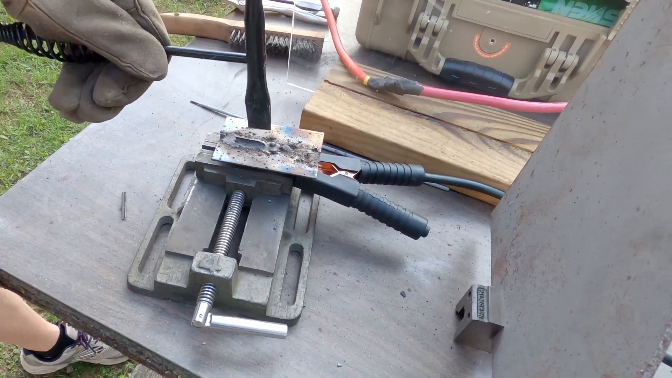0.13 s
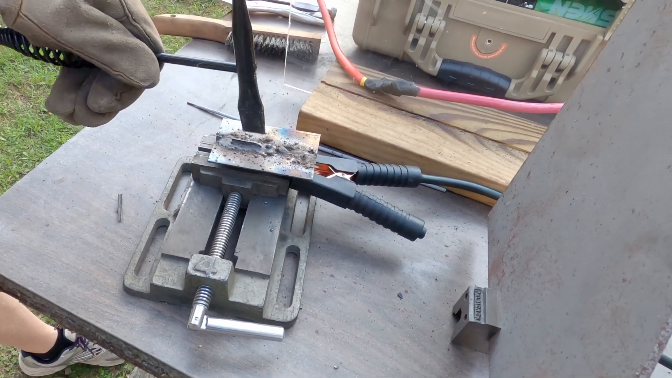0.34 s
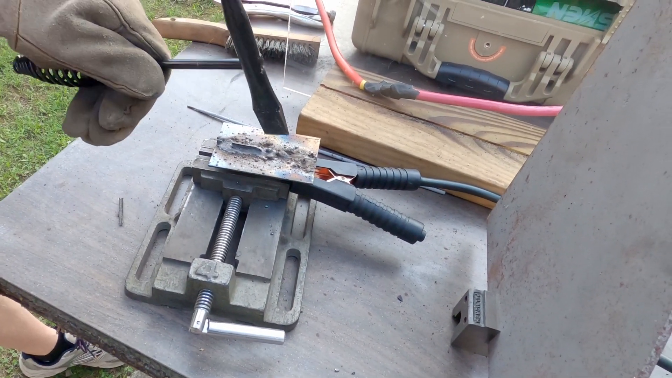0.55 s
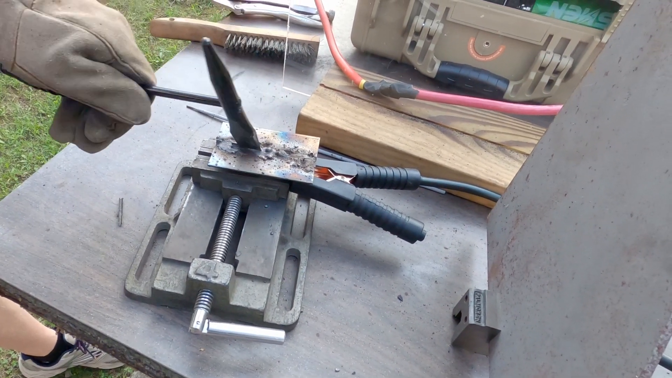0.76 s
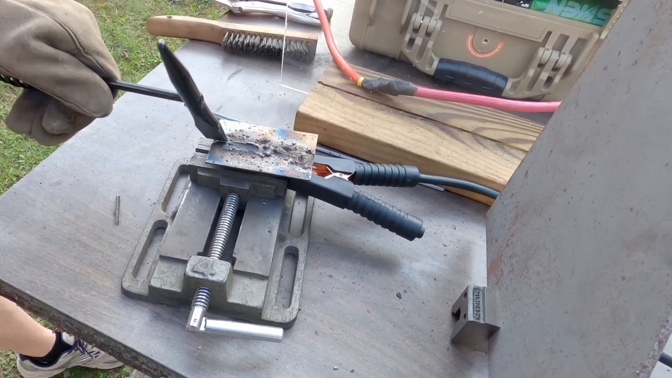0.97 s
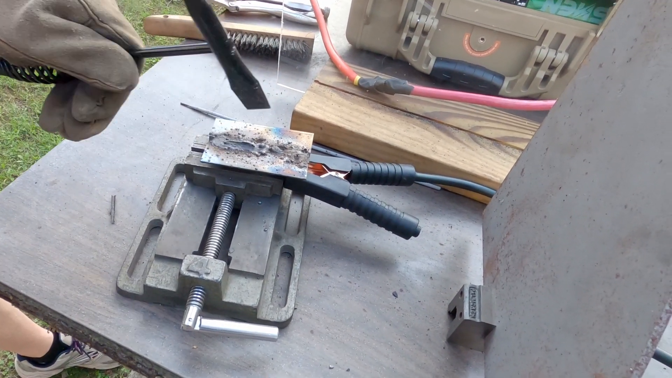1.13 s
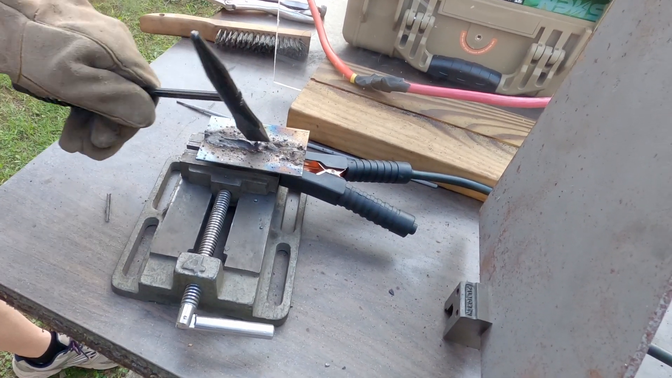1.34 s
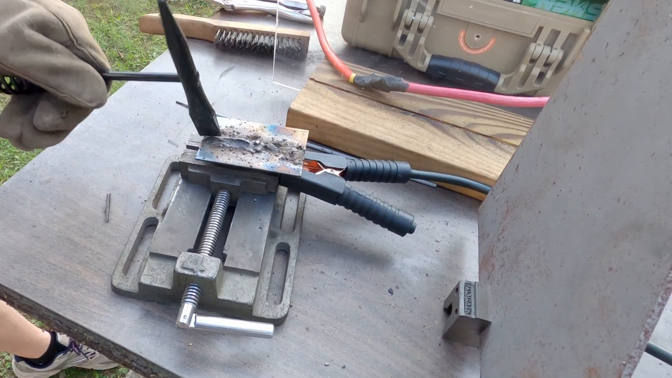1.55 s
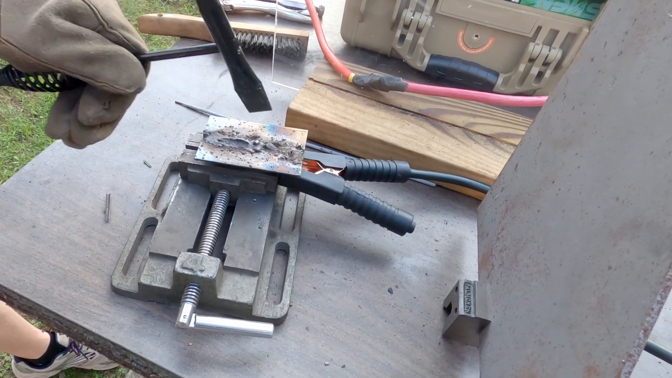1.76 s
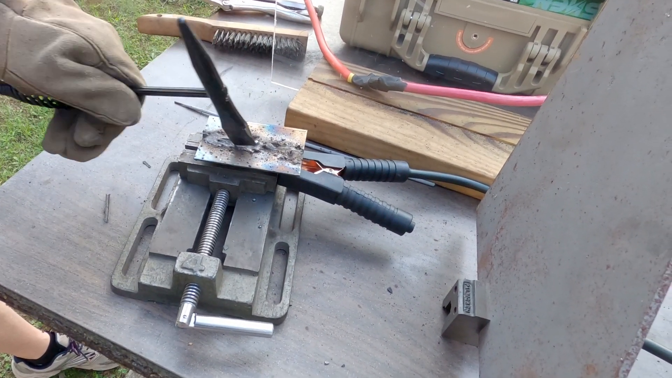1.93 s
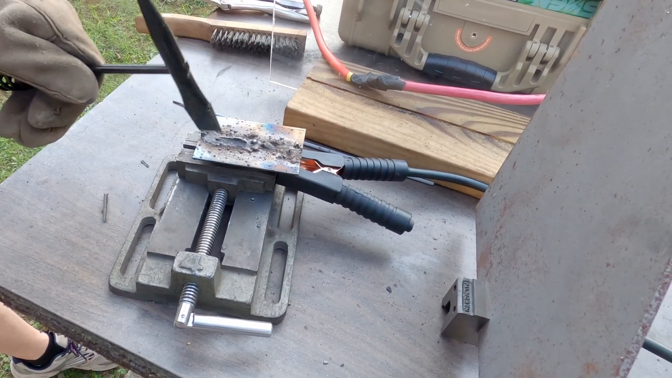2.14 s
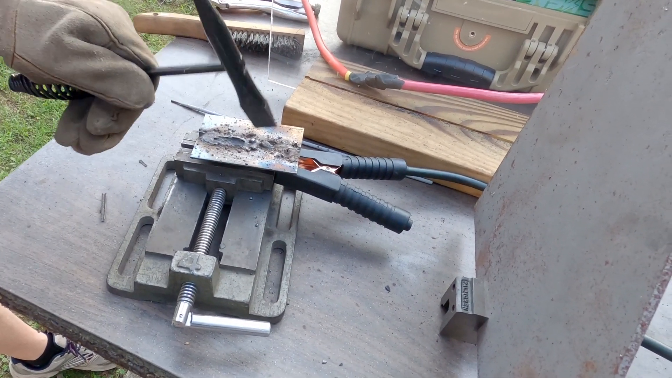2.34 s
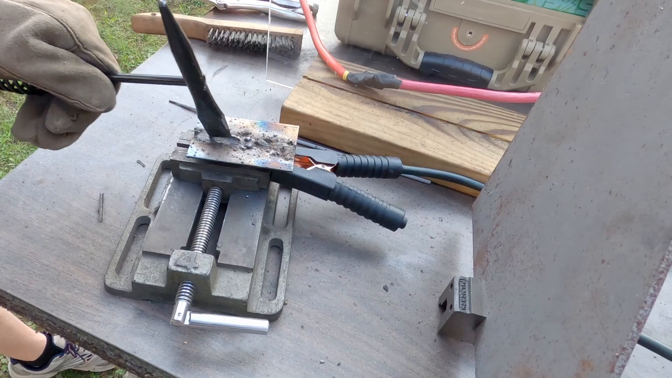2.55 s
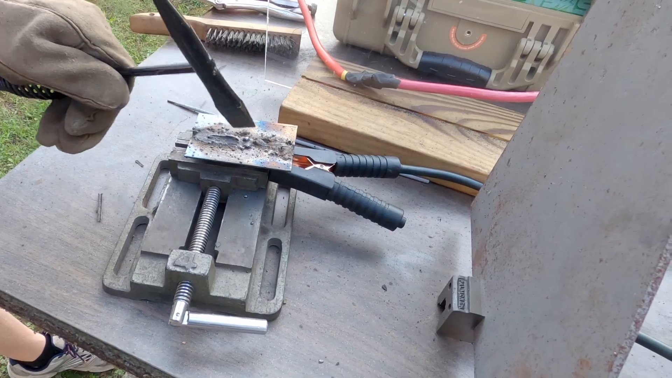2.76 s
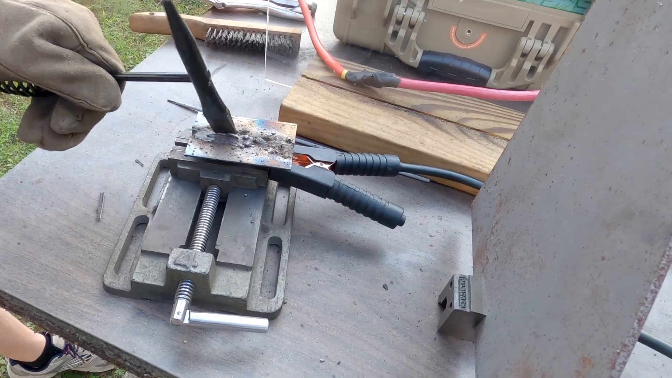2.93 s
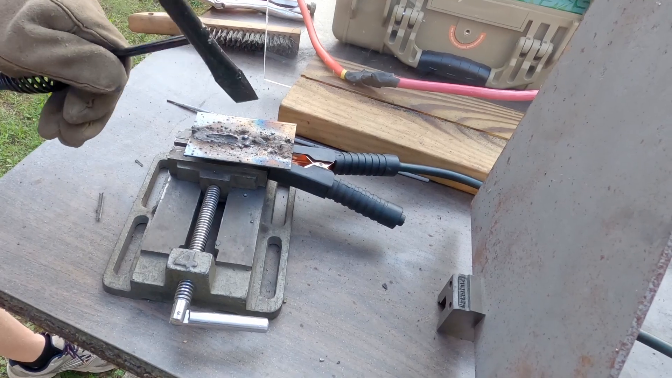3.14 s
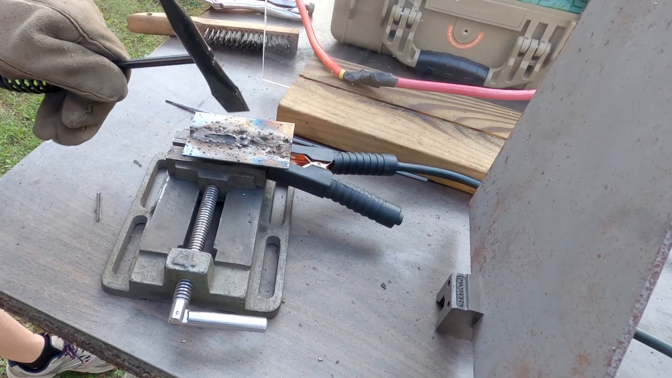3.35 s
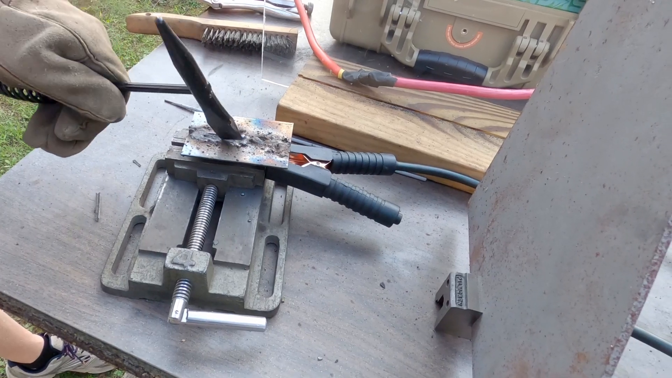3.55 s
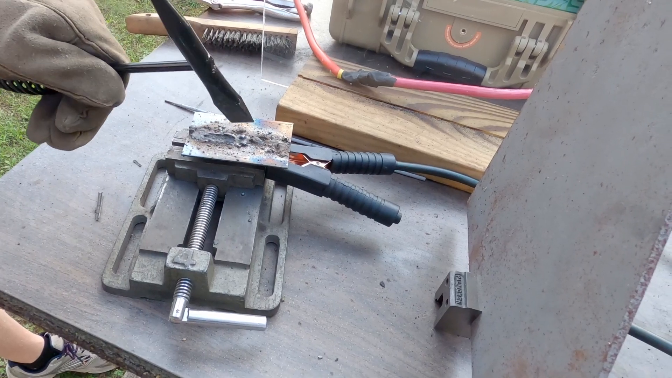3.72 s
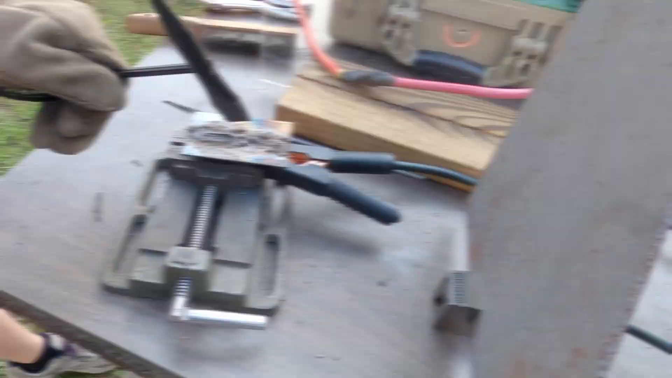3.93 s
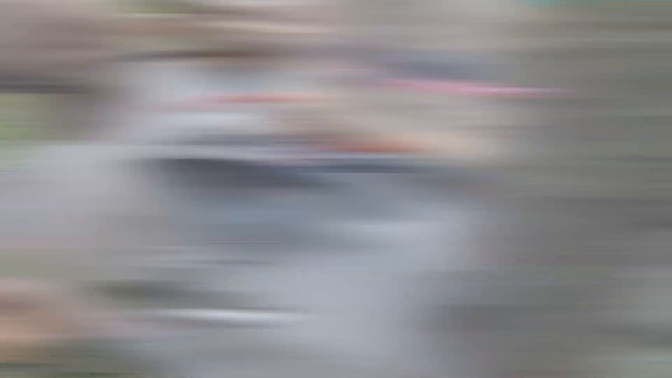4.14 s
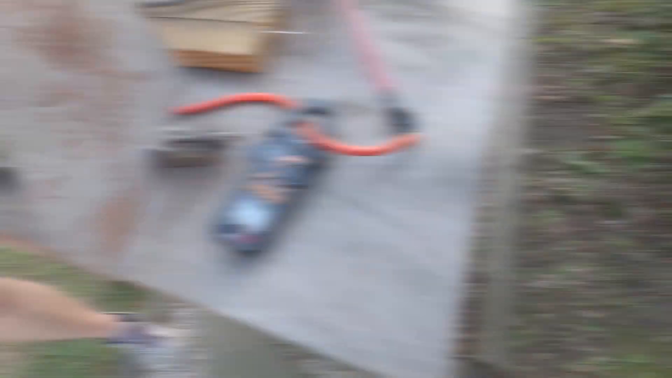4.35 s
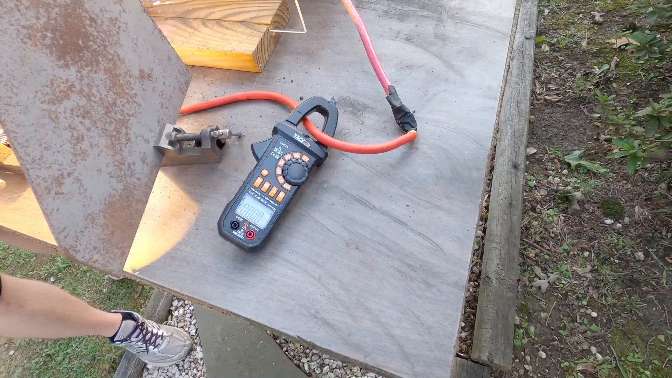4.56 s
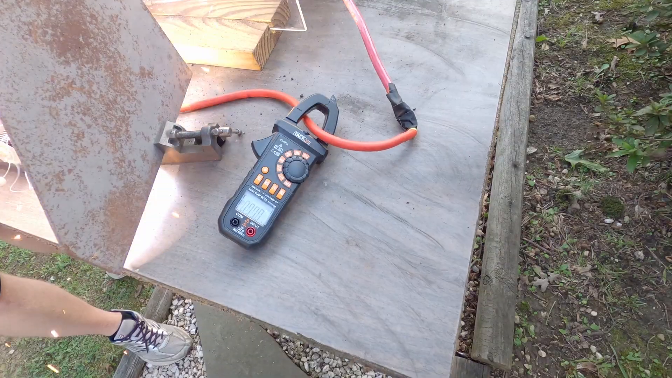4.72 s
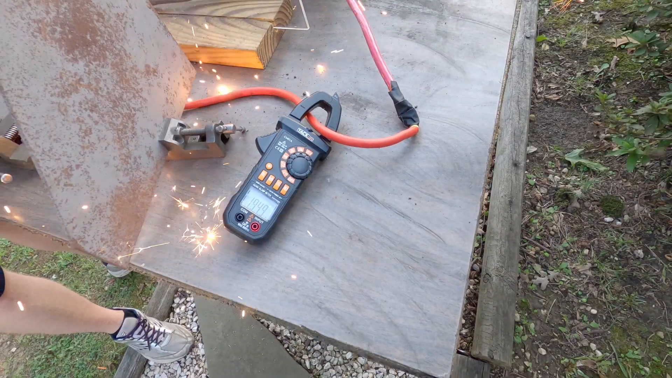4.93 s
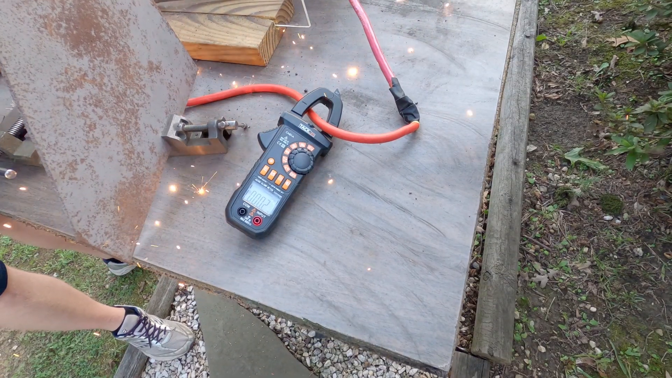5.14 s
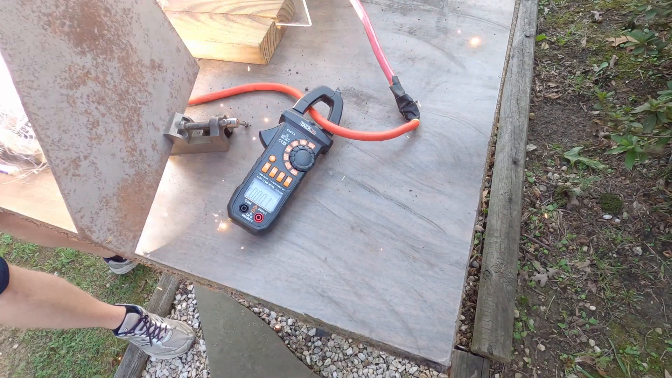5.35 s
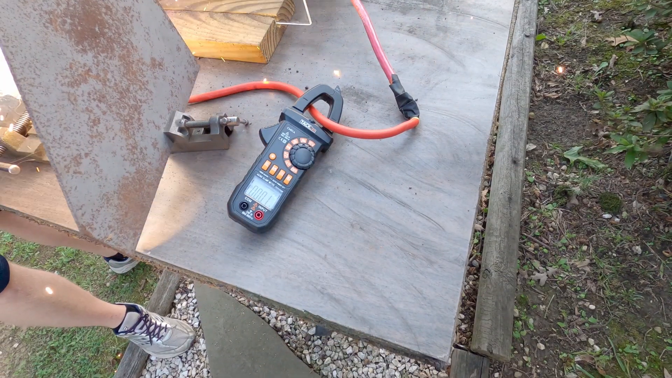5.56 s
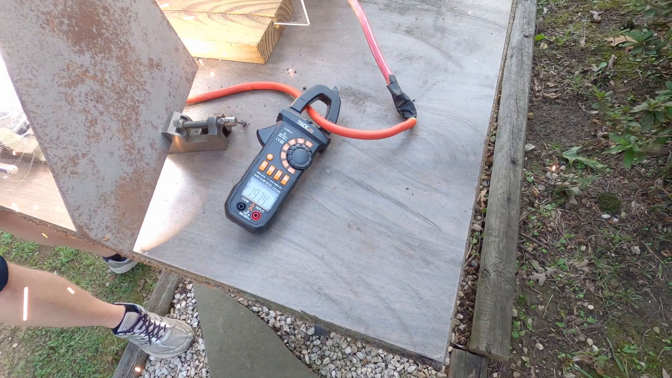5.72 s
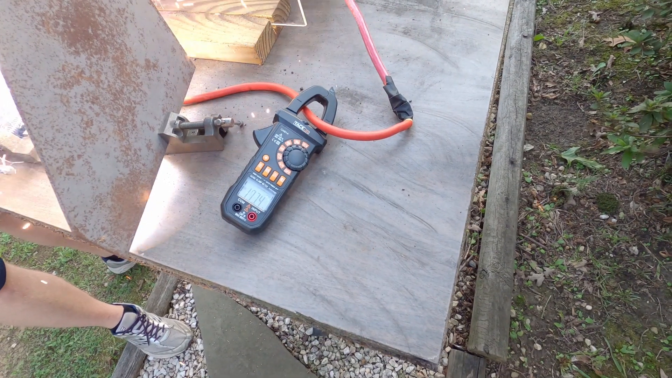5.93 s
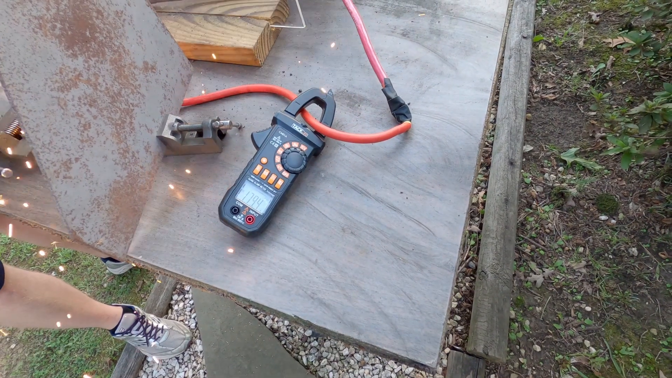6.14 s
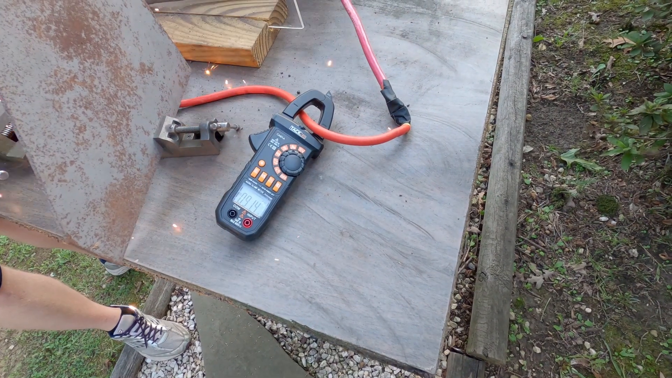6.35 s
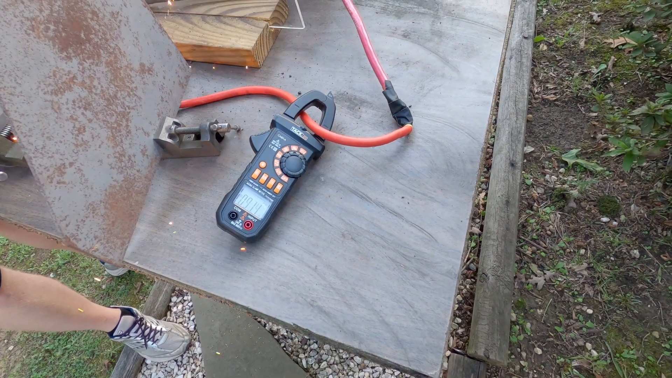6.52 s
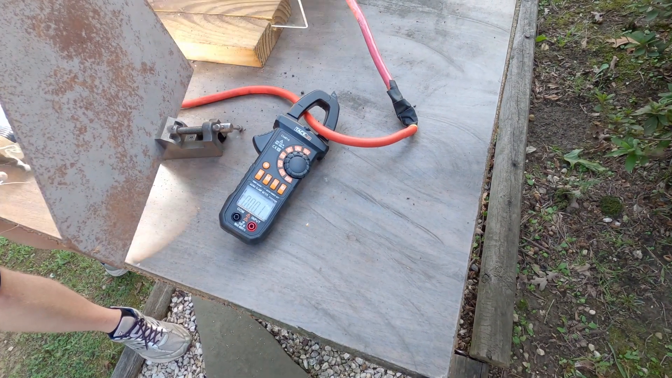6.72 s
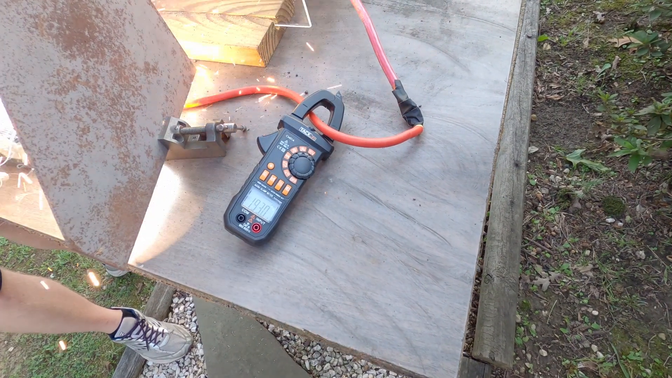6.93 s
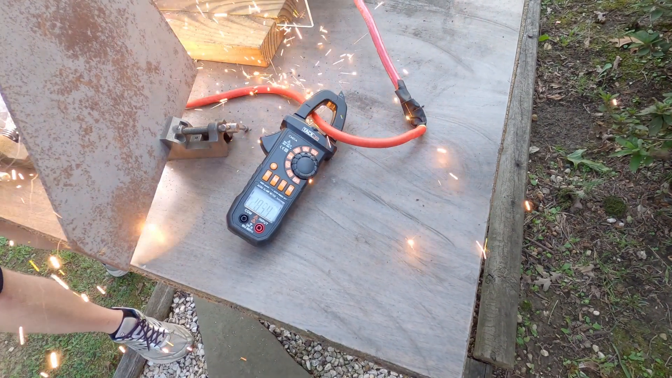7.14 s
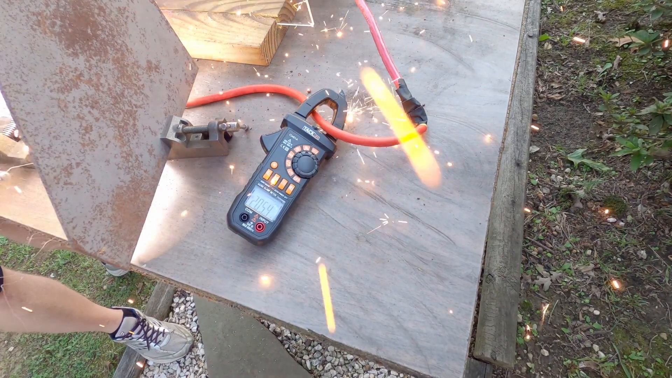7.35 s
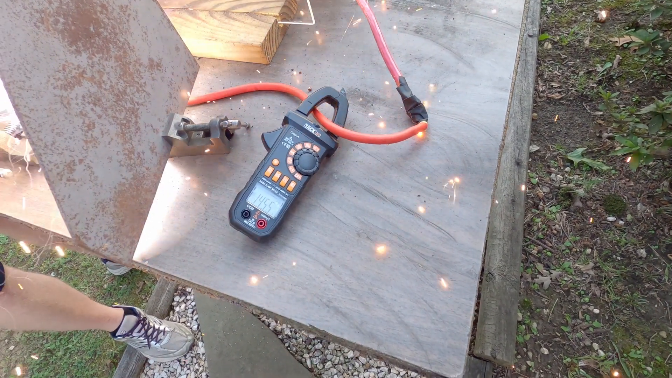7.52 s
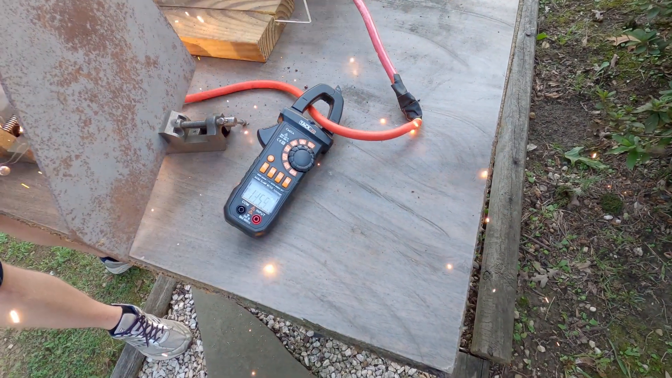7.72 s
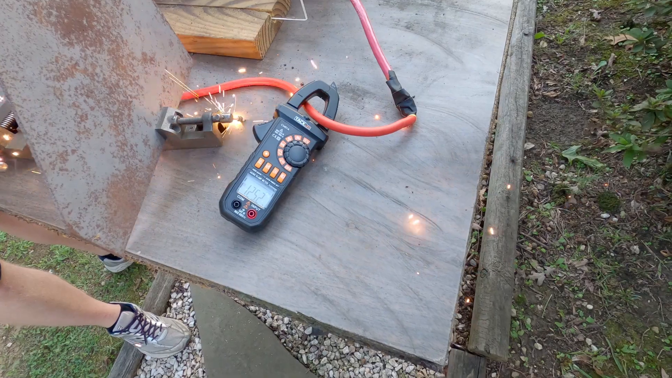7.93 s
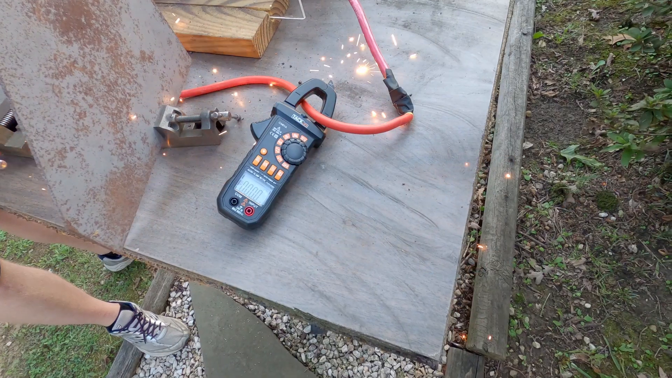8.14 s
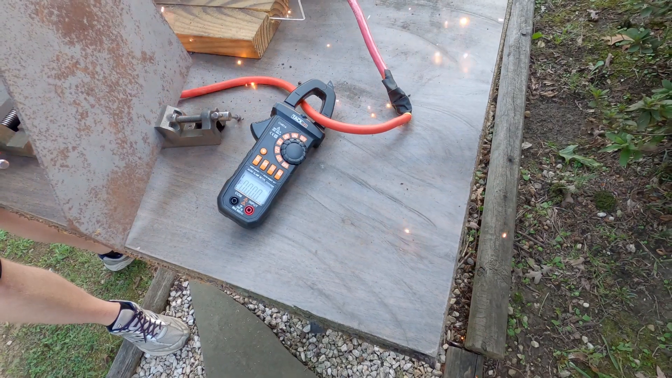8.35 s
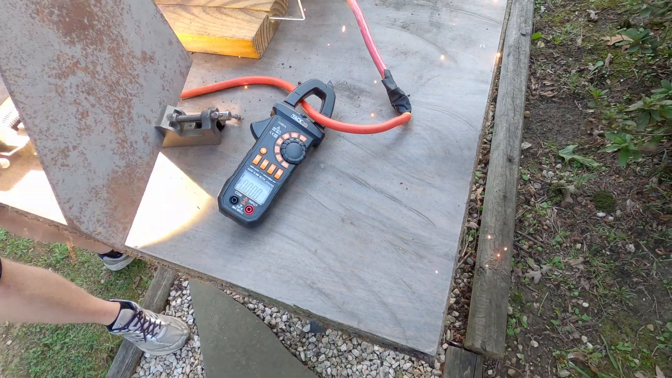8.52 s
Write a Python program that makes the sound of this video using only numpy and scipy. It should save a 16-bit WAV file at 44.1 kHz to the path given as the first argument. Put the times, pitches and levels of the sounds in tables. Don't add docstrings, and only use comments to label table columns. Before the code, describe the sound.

Outdoors, close to a steel workbench, a chipping hammer hits a clamped weld nine times, short clanks with brittle cracks, rebounds and gritty drags, quickening toward the end. Faint hoarse birds and a low machine hum lie behind. Then the scene cuts to an electric arc: five fierce crackling sizzles of uneven length, full of sharp pops, with quiet gaps where sparks tick down. Light wind bumps the single microphone over soft hiss.

```python
import sys
import numpy as np
from scipy import signal
from scipy.io import wavfile
from scipy.ndimage import uniform_filter1d, minimum_filter1d

SR = 44100
rng = np.random.default_rng(int(sys.argv[2]) if len(sys.argv) > 2 else 0)


def convert_level_to_amplitude(level_db):
    exponent = np.asarray(level_db, float) / 20
    return 10 ** exponent


def store_wav(level_fs):
    pcm = np.round(np.clip(np.atleast_2d(level_fs), -1, 1) * 32767)
    wavfile.write(sys.argv[1], SR, pcm.T.astype(np.int16))


N = 378378


def evened(x):
    return x / np.sqrt(np.mean(x ** 2) + 1e-20)


def add(mix, s, sound):
    part = mix[round(s * SR):][:len(sound)]
    part += sound[:len(part)]


def decaying(x, span_s):
    return signal.lfilter([1], [1, -np.exp(-1 / (span_s * SR))], x)


def low_passed(x, hz):
    return signal.lfilter(*signal.butter(2, hz, fs=SR), x)


def resonance(x, hz, width):
    return signal.lfilter(*signal.iirpeak(hz, hz / width, SR), x)


def coloured(x, points, peaks=(), base_db=0):
    hz = np.fft.fftfreq(8192, 1 / SR)
    f, db = np.transpose(points)
    gain = convert_level_to_amplitude(np.interp(np.log(abs(hz) + 1), np.log(f + 1), db))
    bumps = sum(convert_level_to_amplitude(p_db) / (1 + (2 * (abs(hz) - p_hz) / w) ** 2) for p_hz, w, p_db in peaks)
    log_gain = np.log(gain * (convert_level_to_amplitude(base_db) + bumps) + 1e-5)
    taps = np.fft.ifft(np.exp(np.conj(signal.hilbert(log_gain)))).real[:4096]
    return signal.oaconvolve(x, taps / np.linalg.norm(taps))[:len(x)]


def tilted(x, bright_db, split_hz):
    low = low_passed(x, min(split_hz, 15000))
    return low + convert_level_to_amplitude(bright_db) * (x - low)


def wobble(size, span_s):
    return evened(decaying(rng.standard_normal(size + 2000), span_s))[2000:]


def ringing(modes, spread_db, rise_s, rattle_db=3.0):
    t = np.arange(SR // 4) / SR
    sound = np.zeros(len(t))
    for hz, db, t60 in modes:
        luck, detune = rng.standard_normal(2)
        level = db + spread_db * luck - 60 * t / t60
        if rattle_db:
            level = level + rattle_db * wobble(len(t), 0.0021) * np.minimum(t / 0.0051, 1)
        sound += convert_level_to_amplitude(level) * np.sin(2 * np.pi * hz * (1 + 0.003 * detune) * t)
    sound *= 1 - np.exp(-(t / rise_s) ** 2)
    return sound / abs(sound).max()


def burst(points, t60, rise_s, peaks=(), base_db=0):
    t = np.arange(SR // 8) / SR
    shape = convert_level_to_amplitude(-60 * t / max(t60, .002)) * (1 - np.exp(-t / rise_s))
    return coloured(rng.standard_normal(len(t)) * shape / shape.max(), points, peaks, base_db) / 2


# t/s, thud level/dB, plate ring level/dB, head ring level/dB, crack level/dB
HAMMER_BLOWS = [
    (0.652, -11, -19.5, -14, -15),
    (1.291, -13.5, -25.5, -19.5, -14),
    (1.861, -20.5, -20, -23.5, -16.5),
    (2.369, -13, -16, -14.5, -14.5),
    (2.801, -12.5, -18, -17, -22),
    (3.2, -10.5, -27, -17, -18),
    (3.528, -10.5, -17, -10, -12.5),
    (3.785, -11, -13.5, -11, -16),
    (3.982, -25, -23, -24.5, -16.5),
]
# f/Hz, level/dB, t60/s
STEEL_MODES = [(2060, -14, 0.052), (2423, -10.5, 0.09), (2634, -3, 0.11), (3117, -4.5, 0.042),
               (2486, -8, 0.1), (3753, 1, 0.043), (4290, 2, 0.038), (4950, -5.5, 0.04), (6000, -11, 0.093),
               (6600, -12.5, 0.05), (9360, -18, .06), (9820, -9, 0.037)]
# f/Hz, level/dB, t60/s
JAW_MODES = [(606, -5, 0.017), (767.5, -2.5, 0.02), (1052, 6.5, 0.009), (2070, -3, 0.0068)]
# f/Hz, level/dB, t60/s
BENCH_MODES = [(139.5, 4, 0.11), (248.5, 6, 0.12), (455, -6, 0.04), (590, 1.5, 0.055)]
# f/Hz, level/dB, t60/s
EDGE_MODES = [(7100, -3.5, 0.035), (7780, -3.5, 0.031), (10200, -2, 0.03), (12130, 4.5, 0.013)]
# f/Hz, density level/dB per Hz
CRACK_SPECTRUM = [(180, -26), (300, 1.5), (1500, -6.5), (4090, -10), (5430, -19.5), (10000, -20),
                  (16000, -33)]
# t/s, f/Hz, peak level/dB, t60/s
LANDING_MODES = [(0.653, 2060, -14, 0.04), (0.652, 3700, -39, .05), (0.652, 6050, -37, .06),
                 (0.653, 9840, -36, .3), (1.291, 590, -20.5, 0.1), (2.37, 4330, -21.5, 0.047),
                 (3.983, 1055, -14, 0.028), (2.386, 2660, -39, .06), (1.29, 7770, -12, 0.019),
                 (1.291, 3470, -27, 0.064), (1.861, 3740, -25.5, .05), (1.861, 6130, -26.5, 0.085),
                 (1.861, 2165, -25, 0.075), (2.369, 5050, -31, .05), (2.369, 7750, -20.5, 0.034),
                 (2.801, 1890, -37, .04), (3.2, 2400, -46, 0.049), (3.2, 3810, -30, .047),
                 (3.529, 3117, -22, 0.047), (3.528, 1900, -21, 0.024), (3.785, 2020, -21.5, 0.03),
                 (3.785, 1470, -31.5, .05), (3.982, 3700, -25, .06), (1.291, 789, -9, 0.036),
                 (2.369, 810, -15, 0.037), (2.369, 2080, -20, 0.023), (3.528, 780, -11, 0.031)]


def hammer():
    out = np.zeros(N)
    plate = [mode for mode in STEEL_MODES if mode[0] < 2900]
    head = [mode for mode in STEEL_MODES if mode[0] > 2900]
    for s, thud_db, plate_db, ring_db, crack_db in HAMMER_BLOWS:
        add(out, s + 0.00062, convert_level_to_amplitude(thud_db + 8.0) * ringing(JAW_MODES, 0.89, rise_s=0.0013, rattle_db=0))
        add(out, s, convert_level_to_amplitude(ring_db + 5.5) * ringing(head, 2.5, rise_s=0.00088))
        add(out, s, convert_level_to_amplitude(plate_db) * ringing(plate, 1.7, rise_s=0.0011))
        add(out, s, convert_level_to_amplitude(crack_db - 2.0) * ringing(EDGE_MODES, 1.7, rise_s=0.0004))
        add(out, s, convert_level_to_amplitude(-11.5 + 0.46 * thud_db) * ringing(BENCH_MODES, 1.3, rise_s=0.0017))
        crack = tilted(burst(CRACK_SPECTRUM, 0.027, 0.0016), crack_db - ring_db + 2.0, 7700)
        add(out, s, convert_level_to_amplitude(ring_db + 5.5) * crack)
        crumbs = burst(CRACK_SPECTRUM, 0.2, 0.0025)
        add(out, s, convert_level_to_amplitude(-21 + 0.36 * (thud_db + 7.5)) * crumbs)
    for s, hz, db, t60 in LANDING_MODES:
        add(out, s, convert_level_to_amplitude(db) * ringing([(hz, 0, t60)], 0, rise_s=0.00084))
    return out


# t/s, peak level/dB,
# brightness level/dB
EDGE_SNAGS = [(0.699, -34, -1.5), (0.717, -21, -19), (0.734, -15.5, -19), (0.933, -18.5, -26.5),
              (0.965, -39, -1), (1.342, -13.5, -35), (1.37, -29, -4), (1.396, -24, -0.5),
              (1.511, -16.5, -15.5), (1.538, -13.5, -20.5), (1.891, -22, -32), (1.923, -36, -11),
              (1.998, -13, -14), (2.044, -20.5, -13.5), (2.434, -42.5, 1.5), (2.472, -22, -15),
              (2.502, -18, -15), (2.843, -31.5, 1.5), (2.897, -19, -16), (3.244, -36, -5),
              (3.569, -29, -12), (3.829, -30, -10), (3.978, -45.5, 19), (3.988, -7, -19.5),
              (4.039, -43.5, 4), (1.362, -21.5, -8.5), (1.386, -32.5, 1.5), (1.449, -37, -19),
              (1.467, -29, -22), (1.926, -27.5, -2), (1.984, -21, -8.5), (2.009, -17.5, -22),
              (2.055, -20.5, -13), (2.454, -36, -14.5), (2.86, -23, -13), (0.76, -39, -11), (0.85, -34, -7)]
# f/Hz, bandwidth/Hz, level/dB
SCRAPE_MODES = [(590, 84, -5), (790, 55, -6), (1060, 53, 3), (1500, 62, -15.5), (2268, 150, -9),
                (2680, 41, 0), (3625, 70, -1.5), (4320, 40, -3), (6140, 60, -8.5), (7500, 73, -3),
                (9240, 55, -14), (9560, 30, -12.5), (9850, 60, -6.5), (11000, 150, -5.5)]
# f/Hz, density level/dB per Hz
GRIT_SPECTRUM = [(180, -41), (300, 0.5), (1100, -13.5), (1900, -10.5), (7690, -14.5), (8640, -21),
                 (10000, -16), (16000, -33)]


def snags():
    out = np.zeros(N)
    contact_damping = convert_level_to_amplitude(-np.arange(SR // 8) / SR * 250)
    for s, peak_db, bright_db in EDGE_SNAGS:
        woken = [(hz, width, db + 4.7 * rng.standard_normal()) for hz, width, db in SCRAPE_MODES]
        add(out, s, convert_level_to_amplitude(peak_db - 5.5) * ringing(JAW_MODES[1:], 1.4, rise_s=0.00077, rattle_db=1))
        scratch = burst(GRIT_SPECTRUM, 0.053, 0.0028, woken, -15.5)
        add(out, s, convert_level_to_amplitude(peak_db + bright_db + 5.5) * scratch * contact_damping)
    return out


# start t/s, end t/s, pressure level/dB, brightness level/dB, singing f/Hz
EDGE_DRAGS = [
    (0.678, 1.007, -40.5, -4, 9600),
    (1.32, 1.587, -36, -8, 10400),
    (1.894, 2.066, -38.5, -2, 6400),
    (2.394, 2.58, -40, -6, 2680),
    (2.83, 2.957, -43.5, -1, 2680),
]


def drags():
    out = np.zeros(N)
    for start, end, press_db, bright_db, sing_hz in EDGE_DRAGS:
        t = np.arange(0, end - start, 1 / SR)
        size = len(t)
        grip = wobble(size, 0.0027)
        skips = convert_level_to_amplitude(3.3 * np.minimum(rng.exponential(1, size), 2.1)) * (rng.random(size) < 260 / SR)
        skips = evened(decaying(skips, 0.0012))
        rasp = (0.42 + 0.51 * skips) * rng.standard_normal(size)
        sound = convert_level_to_amplitude(2.2 * grip) * coloured(rasp, GRIT_SPECTRUM)
        for hz, width, db in SCRAPE_MODES + [(sing_hz, 35, -1.5)]:
            rub = rng.standard_normal(size) * convert_level_to_amplitude(4.9 * wobble(size, 0.018) + 1.6 * grip)
            sound = sound + convert_level_to_amplitude(db + 16.0) * resonance(rub, hz, width)
        sound = tilted(evened(sound), bright_db, 3000)
        easing = convert_level_to_amplitude(press_db - 20.5 * t + 1.0)
        add(out, start, easing * sound * signal.windows.tukey(size, .15))
    return out


# start t/s, end t/s, rise t/s, steady sizzle level/dB, brightness level/dB
ARC_STRIKES = [
    (4.406, 4.761, 0.0017, -21.5, -5),
    (5.056, 5.097, 0.0018, -20, -7.5),
    (5.322, 6.148, 0.00069, -24.5, -2.5),
    (6.685, 7.624, 0.0088, -23.5, -3),
    (8.435, 8.62, 0.025, -17.5, -3.5),
]
# centre t/s, level/dB, brightness level/dB, half length t/s
ARC_FLARES = [(5.066, -13.5, -10.5, 0.0077), (4.499, -15.5, -3, 0.0029), (4.533, -18, 1.5, 0.0044),
              (4.563, -14, -1, 0.002), (4.62, -11.5, -5, 0.0028), (4.712, -28.5, 4, 0.014),
              (5.349, -14, -3.5, 0.012), (5.41, -22.5, -24, 0.054), (5.476, -18, 1, 0.0056),
              (5.526, -17.5, -2.5, .004), (5.558, -20.5, -5, 0.014), (5.599, -19, -4, 0.017),
              (5.653, -18, 0.5, 0.018), (5.729, -16.5, -2, 0.0053), (5.892, -16, -3.5, 0.0046),
              (5.935, -15, -3, 0.0019), (6.723, -18.5, 2.5, 0.017), (6.819, -23.5, -2.5, 0.014),
              (6.875, -17.5, 0.5, 0.018), (6.931, -13.5, -6, 0.0064), (6.958, -24, 2, 0.0047),
              (7.027, -22, 1, .019), (7.178, -21, 4.5, 0.0058), (7.2, -18, 2, 0.0035),
              (7.443, -17.5, 2.5, 0.0052), (7.473, -21.5, 1, 0.0038), (7.512, -17, 0, 0.0046),
              (7.602, -20.5, -4, 0.0093), (8.55, -17, -1, 0.006), (4.5785, -28, -3, .003),
              (4.593, -17.5, -1.5, 0.0042), (4.716, -18.5, -9, 0.0032), (5.328, -8.5, -4.5, 0.0044),
              (5.746, -12, -4.5, 0.0033), (5.786, -19.5, -1, 0.0065), (5.83, -25.5, 3, 0.0072),
              (6.84, -17.5, 0, 0.0048), (6.912, -16, 2.5, .004), (7.065, -26, 4, 0.003),
              (7.0874, -24, 2, 0.0043), (7.16, -17, -5, 0.0026), (7.297, -26, 9, 0.012),
              (7.346, -23.5, 4.5, 0.0038), (8.471, -30.5, 5, 0.0055), (8.508, -20.5, 0, 0.0074)]
# centre t/s, depth level/dB, half length t/s
ARC_LULLS = [(4.553, -3, 0.0034), (4.637, -2.5, 0.0075), (5.376, -5.5, .006), (5.495, -7.5, 0.0028),
             (5.577, -4, 0.0059), (5.855, 0, 0.0055), (5.896, -0.5, 0.0085), (5.96, -1, 0.0062),
             (6.083, -3.5, 0.0087), (6.753, -10.5, 0.0032), (6.779, -7.5, 0.0093), (6.923, -6.5, 0.012),
             (7.116, -9, 0.0033), (7.193, -2, 0.002)]
# t/s, lift of the hiss level/dB
GAP_LIFT = [(4.41, -4), (4.6, -3), (4.76, -0.5), (5.07, -3), (5.33, -1.5), (5.43, 3), (5.55, -1), (5.8, -2),
            (6.0, -0.5), (6.13, 2.5), (6.7, 0), (6.86, 0.5), (7.0, -1.5), (7.2, -2.5), (7.4, -1.5),
            (7.61, -1), (8.46, -4), (8.58, -2)]


def sizzle():
    t = np.arange(N) / SR
    lit = np.zeros(N)
    power = np.zeros((2, N))
    for start, end, rise, db, bright_db in ARC_STRIKES:
        burning = np.clip(np.minimum((t - start) / rise, (end - t) / 0.015), 0, 1) ** 2
        lit += burning
        power += convert_level_to_amplitude([[2 * db], [2 * (db + bright_db + 0.5)]]) * (burning > 0)
    for s, db, bright_db, half in ARC_FLARES:
        near = slice(round((s - .06) * SR), round((s + 0.13) * SR))
        flare = np.exp(-((t[near] - s) / half) ** 4 / 2)
        power[:, near] += convert_level_to_amplitude([[2 * db], [2 * (db + bright_db + 0.5)]]) * flare
    for s, db, half in ARC_LULLS:
        near = slice(round((s - .06) * SR), round((s + .06) * SR))
        lit[near] *= convert_level_to_amplitude(db * np.exp(-((t[near] - s) / half) ** 4 / 2))
    kicks = convert_level_to_amplitude(6.6 * np.minimum(rng.exponential(1, N), 1.5)) * (rng.random(N) < 400 / SR)
    crackle = 1 + 1.12 * decaying(kicks, 0.00027)
    drive = evened(convert_level_to_amplitude(1.6 * wobble(N, 0.0059)) * crackle * rng.standard_normal(N))
    body = low_passed(drive, 8000)
    top = drive - body
    low = low_passed(drive, 650)
    lazy_power = abs(uniform_filter1d(power[0], size=1500))
    puffs = low * convert_level_to_amplitude(1.66 * wobble(N, 0.0083) - 3.5) * np.sqrt(lazy_power)
    lift_db = np.interp(t, *np.transpose(GAP_LIFT)) + 1.2 * wobble(N, 0.035)
    body = np.sqrt(power[0]) * tilted(body - low, lift_db, 2500)
    top = np.sqrt(power[1]) * convert_level_to_amplitude(0.83 * wobble(N, 0.011) - 1.33) * top
    return lit * (body + puffs + top)


# t/s, peak level/dB, brightness level/dB
DROPS = [(4.4712, -2, 6.5), (4.5428, -4, 2), (4.6014, 5.5, 1), (4.6667, -2.5, 5.5),
         (5.3237, -8.5, -5.5), (5.3647, 2, 2), (5.4795, -4.5, 1), (5.748, -8.5, -6.5),
         (5.7647, -1.5, 4), (5.8175, -2.5, -2.5), (5.8869, -7, 2.5), (6.7002, -2, 5), (6.708, 1, -11),
         (6.7483, 10, -2), (6.7629, 4.5, 1.5), (6.9826, 1, 0), (6.9863, -6, 9), (7.0158, 0.5, -1),
         (7.0281, -2.5, 6), (7.1241, -2.5, 5.5), (7.1833, -2, 1.5), (7.1951, -6, 3), (7.2154, 1, -1),
         (7.2949, -4.5, 3.5), (7.3213, -4, 6.5), (7.4464, -0.5, 3.5), (7.4498, -5, 4.5),
         (7.4743, 0, 0), (7.5953, 0.5, 0), (8.5535, 1.5, 3)]
# t/s, peak level/dB
MORE_DROPS = [(4.4128, 0), (4.4258, -18.5), (4.4327, -3.5), (4.4572, -7.5), (4.4767, -6.5), (4.53, -12),
              (4.5388, -10), (4.589, -8), (4.6056, -9.5), (4.647, -1.5), (4.6527, -3), (4.6968, -7.5),
              (4.7526, -1), (5.0609, -7.5), (5.3337, -5.5), (5.469, -5.5), (5.506, -2.5), (5.5154, -1.5),
              (5.526, -4), (5.5852, -5.5), (5.6128, -4.5), (5.619, -2.5), (5.707, -0.5), (5.7323, -4),
              (5.7669, 0), (5.8333, -8), (5.8918, -12), (6.005, 2.5), (6.0127, -2), (6.0527, 2.5),
              (6.8204, -2), (6.8404, -13), (6.847, -8), (6.8522, -6.5), (6.8552, -9.5), (6.8853, -15),
              (6.8885, -8.5), (6.894, -5), (6.8961, -11.5), (6.9105, -13), (6.9118, -19.5), (6.9587, -0.5),
              (7.0325, -7), (7.0659, -6.5), (7.1273, -7), (7.1777, -1.5), (7.2727, -10), (7.277, -8.5),
              (7.2874, -14.5), (7.2911, -8.5), (7.3478, -5.5), (7.4326, -8), (7.5054, -10.5),
              (7.514, -14.5), (7.5789, -0.5), (8.4625, -8), (8.4695, -12.5), (8.4744, -8), (8.4968, -12),
              (8.5306, -4)]
# delay t/s, share
PLATE_ECHOES = [(.00055, 0.36), (.0009, 0.083), (.0018, 0.2)]


def drops():
    out, t = np.zeros(N), np.arange(SR // 32) / SR
    pulse_s = .00003
    shock = (1 - t / pulse_s) * np.exp(-t / pulse_s)
    echoed = shock + sum(share * np.roll(shock, round(delay * SR)) for delay, share in PLATE_ECHOES)
    for s, db, bright_db in list(DROPS) + [(s, db, 0) for s, db in MORE_DROPS]:
        spray = rng.standard_normal(len(t)) * convert_level_to_amplitude(-16.5 - 60 * t / 0.015)
        add(out, s, convert_level_to_amplitude(db + 3.0) * tilted(echoed + spray, bright_db - 2.0, 6000))
    return out


PUFF_LEVELS = [-13.5, -31.5, -24.5, -35.5, -39]


def ignition():
    out = np.zeros(N)
    for (start, end, rise, *_), db in zip(ARC_STRIKES, PUFF_LEVELS):
        puff = burst([(130, 2), (300, -5.5), (1200, -7), (3000, -19.5)], 0.081, rise)
        add(out, start + .005, convert_level_to_amplitude(db) * puff)
    return out


# f/Hz, density level/dB per Hz
ARC_SPECTRUM = [(59, -43.5), (100, -6.5), (277, 3), (721, -2.5), (1030, -3), (3320, -10), (6420, -9),
                (10000, -4.5), (16000, -5)]
# f/Hz, bandwidth/Hz, level/dB
PLATE_BANDS = [(1556, 91, -6), (3272, 680, 8), (4570, 1200, 4.5), (5484, 200, 0.5), (6860, 400, -9),
               (8150, 710, -4.5), (9970, 1500, 2), (11680, 560, 3), (12900, 750, -5)]
# f/Hz, bandwidth/Hz, depth 0-1
ECHO_NOTCHES = [(490.6, 51, 1), (735, 477, 0.85), (1800, 76, 0.3), (2500, 130, 0.4), (2890, 160, 0.6),
                (3700, 130, 0.65), (5040, 520, 0.7), (7320, 180, 0.4), (8610, 610, 0.6), (14070, 700, .4)]
# (f/Hz, bandwidth/Hz, lift level/dB)
ROD_PLACES = [
    (4.301, [(6550, 710, -4.5), (7300, 220, 0.5), (8450, 200, 3), (8700, 330, -4), (11230, 250, -4), (11700, 510, -5.5)]),
    (5.2, [(6140, 250, -8), (8270, 360, 3), (10580, 200, -3), (11170, 250, -5.5), (11800, 600, -6.5), (15130, 720, 2)]),
    (6.4, [(5290, 160, -6.5), (4960, 220, 5.5), (8100, 260, -7), (11000, 410, -8), (11830, 500, 2), (15600, 700, 3)]),
    (7.15, [(3060, 270, 2.5), (6980, 250, 3), (7960, 440, -4.5), (9280, 450, 4), (10670, 410, -9.5), (15100, 900, 3)]),
    (8.001, [(1500, 500, -5), (3950, 250, 3.5), (6180, 400, 5.5), (7330, 400, -9), (10200, 1400, -8.5), (11530, 700, 3.5), (12440, 430, -11)]),
]
# f/Hz, density level/dB per Hz
PATTER_SPECTRUM = [(100, -33), (250, -5), (2000, -14.5), (8000, -11), (16000, -14.5)]


def arc():
    out = sizzle() + drops() + ignition()
    t = np.arange(SR // 2) / SR
    tail = rng.standard_normal(len(t)) * convert_level_to_amplitude(-60 * t / 0.067) * (t > .003)
    spark_trail = rng.standard_normal(len(t)) * convert_level_to_amplitude(-60 * t / 0.75)
    spark_trail = coloured(spark_trail / np.linalg.norm(spark_trail), PATTER_SPECTRUM)
    far = convert_level_to_amplitude(-29.5) * signal.oaconvolve(out, spark_trail)[:N]
    out = out + convert_level_to_amplitude(-15.5) * signal.oaconvolve(out, tail / np.linalg.norm(tail))[:N]
    for hz, width, depth in ECHO_NOTCHES:
        out = out - depth * resonance(out, hz, width)
    ends = [start for start, _ in ROD_PLACES[1:]] + [N / SR]
    for (start, bands), end in zip(ROD_PLACES, ends):
        here = slice(round(start * SR), round(end * SR))
        for hz, width, db in bands:
            out[here] += (convert_level_to_amplitude(db) - 1) * resonance(out[here], hz, width)
    patter = convert_level_to_amplitude(2.8 * wobble(N, .006) + 2.0)
    return convert_level_to_amplitude(2.0) * coloured(out, ARC_SPECTRUM, PLATE_BANDS, -3.0) + far * patter


# t/s, peak level/dB
SPARK_LANDINGS = [(4.8263, -38), (4.849, -44), (4.993, -38.5), (5.1453, -36.5), (5.239, -41), (7.662, -44),
                  (7.7245, -38.5), (7.793, -41), (7.858, -41), (7.932, -42), (7.968, -46), (7.8243, -33.5),
                  (8.125, -39.5)]


def sparks():
    out = np.zeros(N)
    for s, peak_db in SPARK_LANDINGS:
        add(out, s, convert_level_to_amplitude(peak_db - 7.0) * burst([(300, -6), (3000, -5.5), (16000, -17)], 0.042, 0.0017))
    return out


# t/s, peak level/dB, t60/s
MIC_NUDGES = [
    (0.819, -35, 0.14),
    (1.419, -28, 0.12),
    (4.268, -27, 0.038),
    (4.299, -39, 0.04),
    (6.341, -41.5, 0.12),
    (7.978, -39.5, 0.058),
    (8.201, -39.5, 0.06),
]


def nudges():
    out = np.zeros(N)
    for s, peak_db, t60 in MIC_NUDGES:
        rocking = ringing([(70.0, 0, 2.1 * t60)], 0, rise_s=0.0036, rattle_db=0)
        add(out, s + 0.0059, convert_level_to_amplitude(peak_db - 3.5) * rocking)
        rub = burst([(60, 5.0), (250, 3.5), (900, -17.5), (2200, -34), (3000, -54)], t60, 0.00088)
        add(out, s, convert_level_to_amplitude(peak_db) * rub)
    return out


# start t/s, end t/s, f/Hz, level/dB
BIRD_CALLS = [
    (0.407, 0.645, 3000, -59.5),
    (0.958, 1.124, 2870, -59),
    (2.598, 2.83, 2900, -53),
    (6.599, 6.687, 4570, -71.5),
    (8.32, 8.402, 4570, -74),
]


def birds():
    out = np.zeros(N)
    for start, end, hz, db in BIRD_CALLS:
        size = round((end - start) * SR)
        air = rng.standard_normal(size) * convert_level_to_amplitude(2.4 * wobble(size, 0.0086))
        throat = signal.butter(1, [hz - 130, hz + 190], "bandpass", fs=SR, output="sos")
        call = evened(signal.sosfilt(throat, air))
        add(out, start, convert_level_to_amplitude(db) * call * signal.windows.tukey(size, .35))
    return out


# f/Hz, density level/dB per Hz
HAMMER_HISS = [(59, -34.5), (100, 3), (119, -16), (193, -4.5), (229, -12), (1130, -19.5), (1330, -24),
               (3470, -29), (7140, -31), (16000, -32.5)]
# f/Hz, density level/dB per Hz
WELD_HISS = [(59, -42), (100, 4.5), (163, -22), (215, -14), (249, -9), (308, -21.5), (398, -12.5),
             (513, -19.5), (1870, -29.5), (7290, -30.5), (16000, -32.5)]
# f/Hz, bandwidth/Hz, level/dB
MACHINE_HUM = [(87.6, 14, -50.5), (196, 6.3, -63.5), (268, 5.8, -60.5), (460, 6, -64.5), (1320, 4, -65.5),
               (7330, 530, -63), (12021, 3.8, -79.5)]
# t/s, level/dB
WIND_LEVEL = [
    (0.0, -40.5),
    (0.36, -47),
    (2.03, -39),
    (2.58, -44),
    (3.94, -38),
    (4.73, -46.5),
    (6.43, -49.5),
    (7.22, -42.5),
    (7.65, -48),
    (8.58, -47.5),
]
# f/Hz, density level/dB per Hz
GUST_SPECTRUM = [(10, 9.5), (25, -0.5), (50, -1.5), (100, -7), (200, -18.5), (500, -67.5)]


def surroundings():
    t = np.arange(N) / SR
    first = convert_level_to_amplitude(-45.5 - 2.5) * coloured(rng.standard_normal(N), HAMMER_HISS)
    for hz, width, db in MACHINE_HUM:
        chance = 1 / 200 + rng.standard_normal(N) + 1j * rng.standard_normal(N)
        drift = signal.lfilter([1], [1, -np.exp(-np.pi * width / SR)], chance)
        first += convert_level_to_amplitude(db) * evened((drift * np.exp(2j * np.pi * hz * t)).real)
    second = convert_level_to_amplitude(-55.5) * coloured(rng.standard_normal(N), WELD_HISS, [(7300, 800, -1.5)])
    gust_db = np.interp(t, *np.transpose(WIND_LEVEL)) + 4.97 * wobble(N, 0.018)
    wind = evened(coloured(rng.standard_normal(N), GUST_SPECTRUM)) * convert_level_to_amplitude(gust_db)
    floor = np.where(t < 4.217, first, second)
    return floor * convert_level_to_amplitude(0.4 * wobble(N, 0.062)) + wind


def scene():
    mono = hammer() + snags() + drags() + arc() + sparks() + nudges() + birds() + surroundings()
    return np.array([mono, mono])


def roll_off(x):
    return signal.sosfilt(signal.butter(12, 16580, fs=SR, output="sos"), x)


def record(dry):
    band = signal.firwin(511, 15760, window=("kaiser", 9), fs=SR)
    limited = signal.oaconvolve(np.clip(dry, -1, 1), band[None], "same")
    treble = limited - low_passed(limited, 1200)
    now = abs(uniform_filter1d(treble[0] ** 2, size=64)) + 1e-20
    coming = -minimum_filter1d(-now, size=400, origin=-200) * convert_level_to_amplitude(2 * -36)
    limited = limited - treble / (1 + (now / coming) ** 2)
    level = np.sqrt(abs(uniform_filter1d(limited[0] ** 2, 1024)))
    parted = np.repeat(rng.random(N // 2048 + 1) < .35, 2048)[:N]
    trace_db = np.where(level < convert_level_to_amplitude(-38), -32, np.where(parted, -23, -55))
    noise = coloured(rng.standard_normal(N), [(50, 8.0), (1000, 1.0), (15500, 4.0), (16500, -57.0)])
    side = convert_level_to_amplitude(trace_db) * level * noise
    mix = np.clip(limited + np.array([side, -side]), -1, 1)
    return roll_off(mix)


dry = scene()
out = record(dry)
store_wav(out)
```